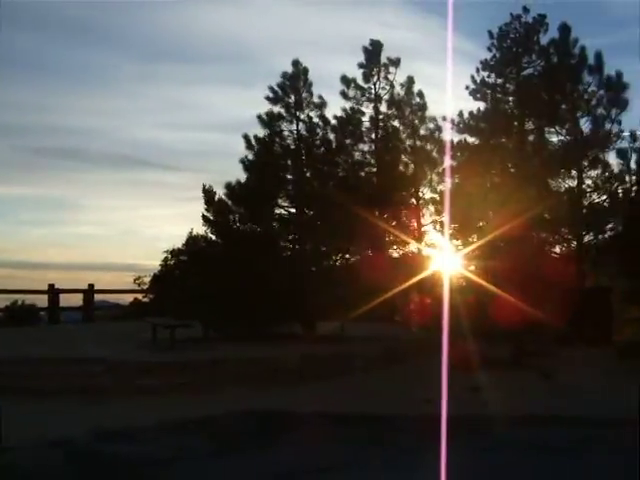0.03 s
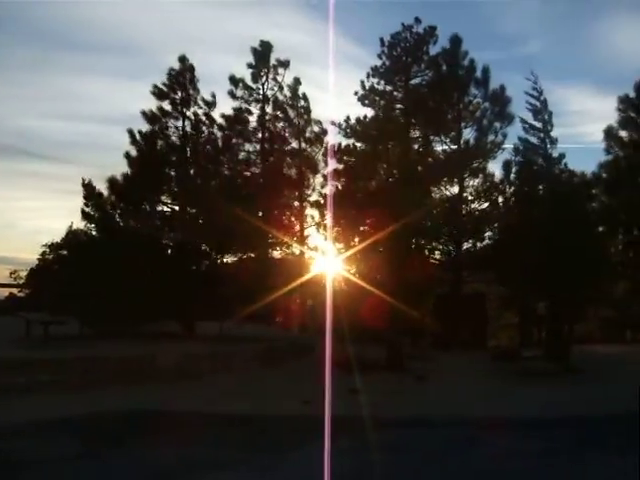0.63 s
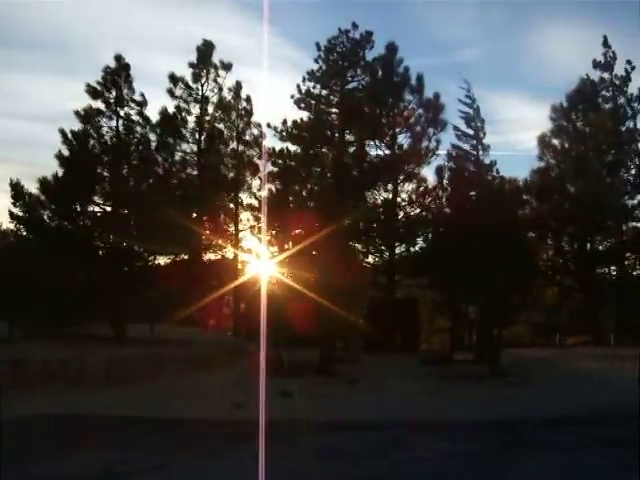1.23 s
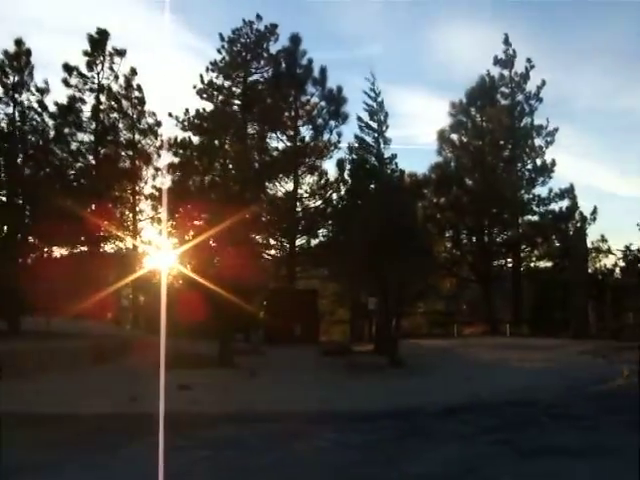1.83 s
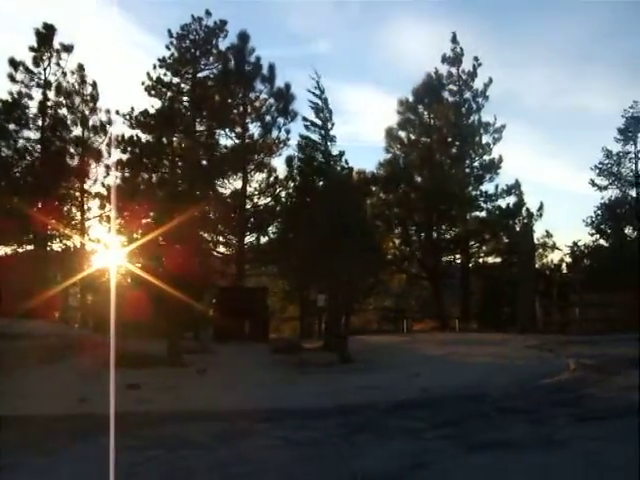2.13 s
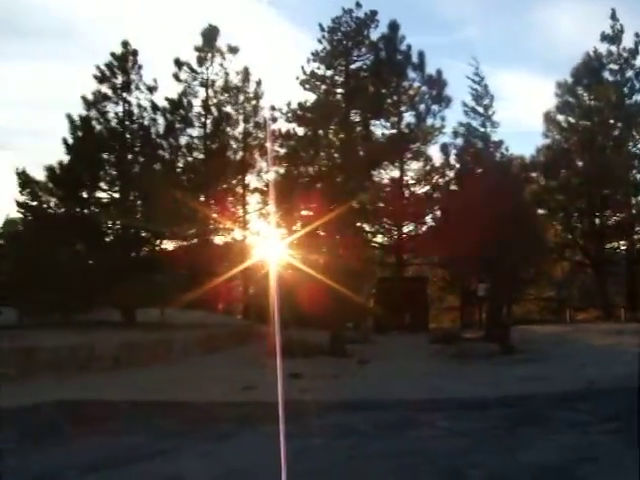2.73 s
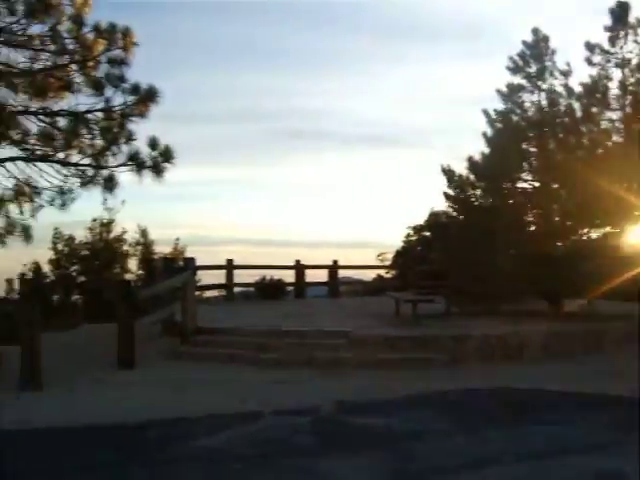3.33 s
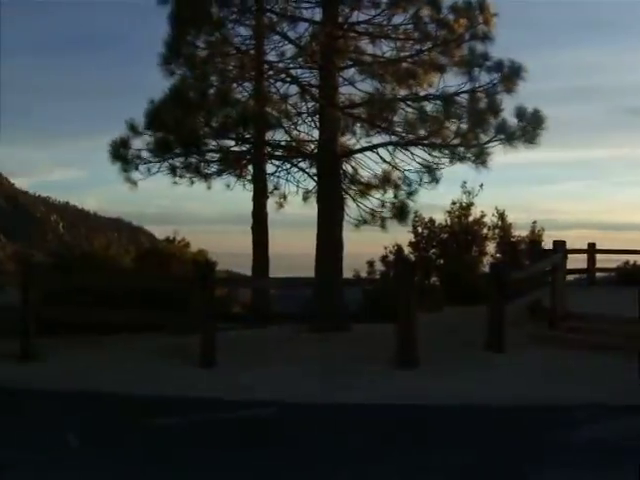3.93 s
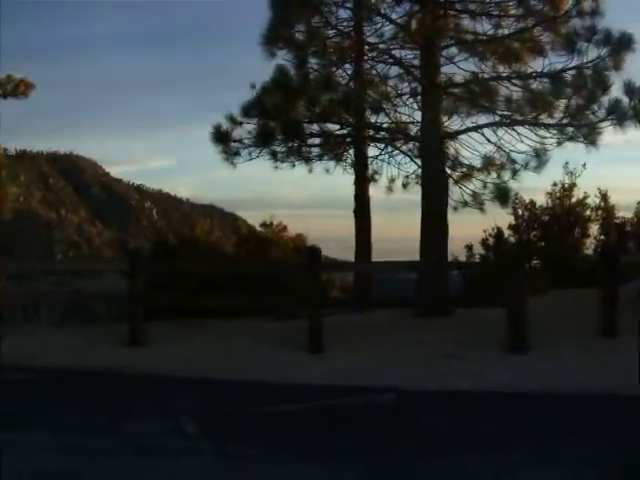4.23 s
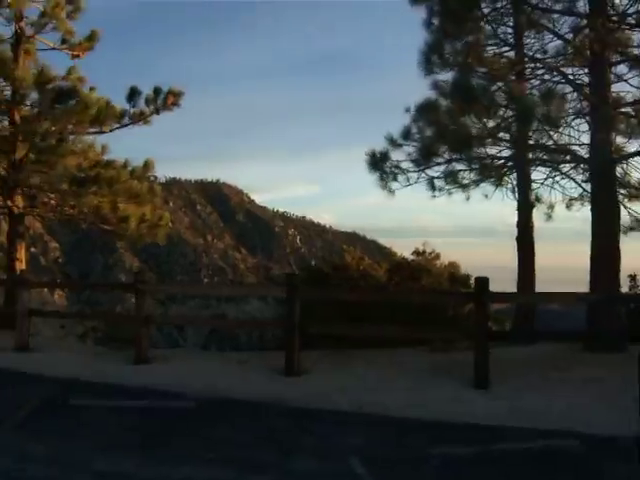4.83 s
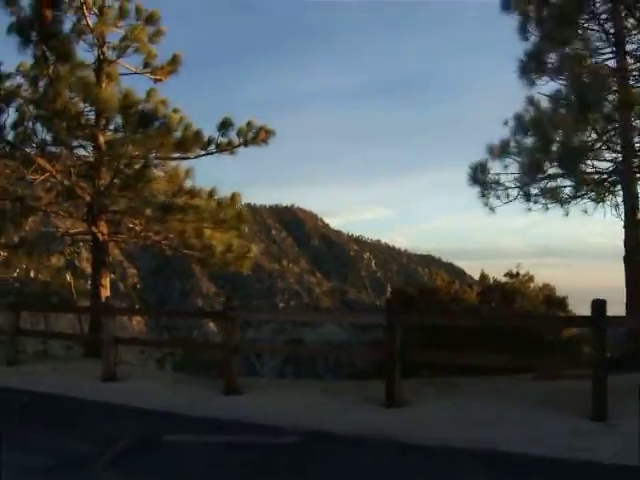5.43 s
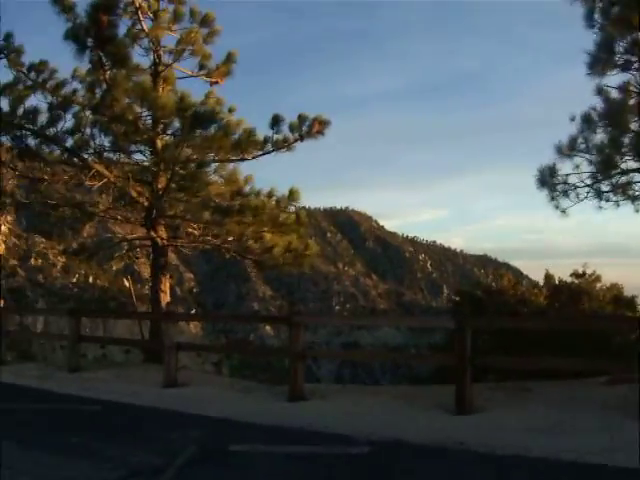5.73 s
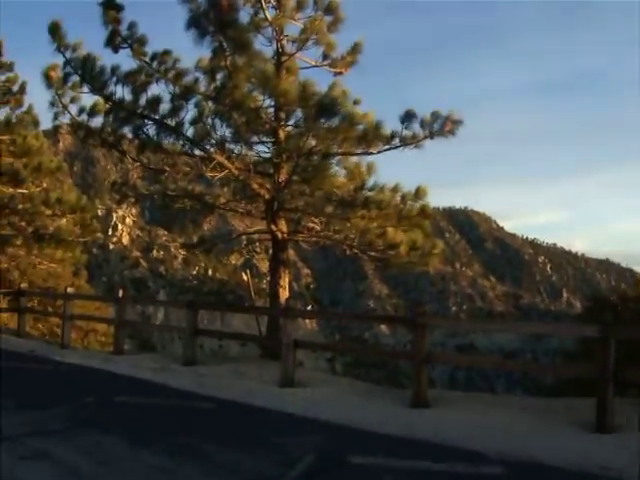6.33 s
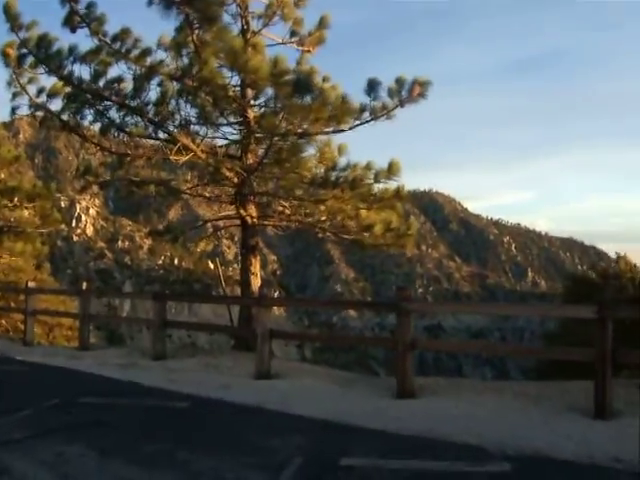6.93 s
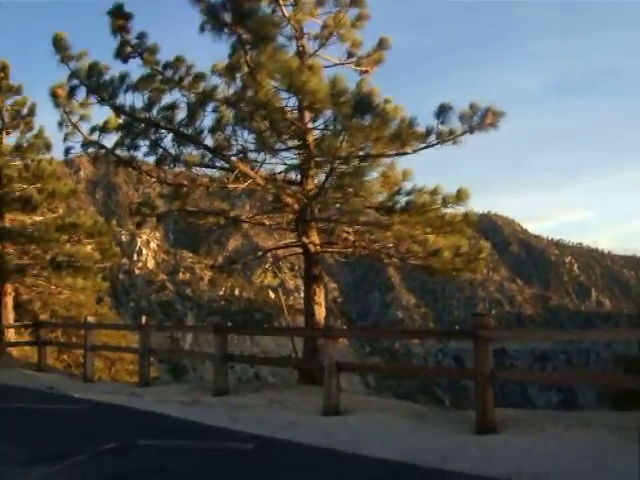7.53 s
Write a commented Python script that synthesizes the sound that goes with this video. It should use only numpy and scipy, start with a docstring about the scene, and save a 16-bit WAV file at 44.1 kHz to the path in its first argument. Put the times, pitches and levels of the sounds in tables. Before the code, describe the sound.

Strong wind roars through pine trees throughout, with a hiss of needles on top, heard from a small handheld camera. A gust thumps the microphone right at the start, then the trees dominate, with a few light bumps. The lens motor whines faintly at about 0.2 and 1.9 seconds, and a very faint, thin electronic whistle runs underneath. From 2 seconds the buffeting builds into heavy rumbling, fluttering and popping, peaking around 2.6 and easing by 3. The trees then rush on with only small puffs against the microphone. At 5 seconds ragged blasts return and continue almost without a break, rumbling and rasping, the loudest briefly ducking the sound of the trees. From about 6.5 seconds a few grains of grit tick on the camera case. The wind swells to a hard, tearing gust around 7.5 seconds.

```python
"""A gust thumps the microphone of a small handheld camera while strong wind roars through pines.
The crowns roar and the needles hiss. Eddies at the microphone port rumble, flutter, rasp and pop,
flow breaks from the case in ragged blasts, and the gain control ducks the trees under the loudest.
The lens motor whines faintly twice over a thin electronic whistle; late on, grit ticks on the case."""
import sys
import numpy as np
from scipy import signal
from scipy.fft import rfft, irfft, next_fast_len
from scipy.io import wavfile
from scipy.ndimage import uniform_filter1d, map_coordinates

SR = 44100
rng = np.random.default_rng(int(sys.argv[2]) if len(sys.argv) > 2 else 0)


def to_wav(s):
    """Save 16-bit WAV."""
    ch = np.atleast_2d(s).T  # columns
    pcm = np.round(np.clip(ch, -1, 1) * 32767)  # PCM
    wavfile.write(sys.argv[1], SR, pcm.astype(np.int16))


N = 339129
TIME = np.arange(N) / SR


def amp(db):
    """Decibels to gain."""
    return 10 ** (np.asarray(db) / 20)


def unit(x):
    """x at rms 1."""
    return x / np.sqrt(np.mean(x ** 2) + 1e-20)


def curves(rows):
    """One value per sample for each column after the time."""
    times_s, *columns = np.transpose(rows)
    return [np.interp(TIME, times_s, column) for column in columns]


def wobble(rate_hz):
    """Smooth random curve, rate_hz knots a second."""
    return map_coordinates(rng.standard_normal(int(N * rate_hz / SR) + 4), [TIME * rate_hz])


def filtered(x, response):
    """x through a frequency response."""
    size = next_fast_len(N + SR // 2)
    return irfft(rfft(x, size) * response(np.fft.rfftfreq(size, 1 / SR)), size)[:N]


def coloured(x, spectrum):
    """x shaped by (frequency [Hz], level [dB]) points, at rms 1."""
    points_hz, db = np.transpose(spectrum)
    return unit(filtered(x, lambda hz: amp(np.interp(np.log(hz + 1), np.log(points_hz), db))))


def swell(start_s, length_s, release_s, attack_s=0.018):
    """Envelope of a push of air: quick rise, hold, exponential release."""
    rise = np.clip((TIME - start_s) / attack_s + 0.5, 0, 1)
    return rise * np.exp(-np.maximum(TIME - start_s - length_s, 0) / release_s)


def ragged(age_s, length_s, attack_s=0.0006):
    """Envelope of a rough burst: sharp start, short hold, quick collapse."""
    rise = 1 - np.exp(-np.maximum(age_s, 0) / attack_s)
    return rise * np.exp(-np.clip(age_s / length_s, 0, 5) ** 3)


# Gusts on the microphone: (start [s], length [s], level [dB], brightness: small eddies over large [dB])
GUSTS = [(-.01, 0.087, -22, 3), (0.065, 0.18, -29, 2), (0.786, 0.055, -35, -4), (1.476, 0.048, -24, -1),
         (1.655, 0.064, -32, -3), (1.98, 0.12, -27, 2.5), (2.144, 0.11, -26.5, 1),
         (2.339, 0.23, -18.5, -0.5), (2.573, .17, -13, -2), (2.78, 0.11, -19.5, -0.5),
         (3.182, .025, -35, 0), (3.536, 0.085, -30, -1.5), (4.118, .14, -35, -5.5),
         (4.595, 0.018, -35, 0.5), (4.832, 0.022, -36, -5), (4.985, 0.12, -28, 9), (5.099, 0.05, -22, 10),
         (5.164, 0.18, -17, -3.5), (5.419, 0.13, -15.5, -2), (5.59, 0.072, -39, -4),
         (5.774, 0.23, -20, 4.5), (6.036, 0.18, -26.5, 3), (6.29, .23, -26, 0.5), (6.602, 0.1, -25.5, 5.5),
         (6.708, 0.13, -18, -1), (6.878, 0.14, -21, 1), (7.075, .24, -19.5, 2.5), (7.32, 0.24, -11, -6.5),
         (7.581, 0.1, -12, 8)]
# Draught between gusts: (time [s], level [dB])
DRAUGHT = [(0, -32), (.7, -35), (1, -48.5), (1.85, -38.5), (2.3, -29.5), (3, -34.5), (3.45, -38),
           (3.9, -47), (4.9, -48.5), (5.2, -23), (6.3, -33), (7.69, -16.5)]

def flow(tilt, release_s, draught_bright_db=-1):
    """Strength of one eddy size: draught and gusts add in power; tilt is dB per dB of brightness."""
    draught_db, = curves(DRAUGHT)
    power = amp(draught_db + tilt * draught_bright_db) ** 2
    for start_s, length_s, db, bright_db in GUSTS:
        power += (amp(db + tilt * bright_db) * swell(start_s, length_s, release_s)) ** 2
    return np.sqrt(power)


def eddies(spectrum, lumps_db):
    """Lumpy turbulence, its strength evened over about a tenth of a second."""
    noise = coloured(rng.standard_normal(N) * amp(lumps_db), spectrum)
    window = np.hanning(SR // 8)
    power = np.abs(signal.fftconvolve(noise ** 2, window / window.sum(), "same"))
    return noise / np.sqrt(power + 1e-6)


# Eddy spectra, largest eddies first: (frequency [Hz], relative level [dB])
HEAVE_SPECTRUM = [(8, -13.5), (22, -3), (50, -0.5), (75, -7), (130, -33), (400, -72)]
RUMBLE_SPECTRUM = [(5, -4), (20, 1), (50, -3), (110, -1.5), (170, -14.5), (300, -36.5), (800, -75)]
FLUTTER_SPECTRUM = [(40, -28.5), (100, -7), (150, 3), (320, -1.5), (450, -10), (700, -31.5), (1500, -47),
                    (4000, -80)]
RASP_SPECTRUM = [(200, -23), (380, 2.5), (500, -0.5), (750, -3), (1000, -9.5), (1400, -22), (2000, -25.5),
                 (3000, -32), (8000, -63)]
TEAR_SPECTRUM = [(400, -9.5), (1200, 9), (1600, 1.5), (2400, 0.5), (3500, -6), (4800, -14.5), (7500, -21.5),
                 (8800, -43)]
# Air tearing across the port's edge: (start [s], length [s], level [dB])
TEARS = [(0.097, 0.022, -33.5), (5.909, 0.054, -31.5), (6.363, 0.34, -38), (6.87, .27, -40),
         (7.163, .15, -32.5), (7.393, 0.11, -29), (7.588, .12, -14.5)]
# Flow stalls at the port: (centre [s], small-eddy dip [dB], half length [s])
STALLS = [(2.727, 7, 0.014), (2.765, 3, 0.0098), (5.088, 1, 0.0037), (5.337, 10, 0.015), (5.775, 15, 0.019),
          (5.852, 18, 0.0095), (6.762, 6, 0.011), (6.863, -1, 0.0083), (7.537, 20, 0.021)]

def buffeting():
    """Large eddies shed small ones in bursts; the small are more fitful and die sooner."""
    bursts = 1.1 * wobble(45) + 1.15 * wobble(220)
    sputter = 0.82 * wobble(60) + 0.65 * wobble(260)
    small_flow = flow(tilt=1, release_s=0.01)
    edge_flow = sum(amp(db) * swell(start_s, length_s, release_s=0.01) for start_s, length_s, db in TEARS)
    rumble = amp(0.5) * flow(tilt=-0.36, release_s=0.04) * eddies(RUMBLE_SPECTRUM, 1.7 * bursts)
    heave = amp(-6.5) * flow(tilt=-1.3, release_s=0.04) * eddies(HEAVE_SPECTRUM, bursts)
    flutter = amp(-1.5) * flow(tilt=0.35, release_s=0.031) * eddies(FLUTTER_SPECTRUM, 3.33 * sputter)
    rasp = amp(-7.5) * small_flow * eddies(RASP_SPECTRUM, 2.2 * sputter + 2.0 * bursts)
    tear = (amp(-30) * small_flow + edge_flow) * eddies(TEAR_SPECTRUM, 3.35 * bursts)
    stall_db = sum(db * np.exp(-((TIME - at_s) / half_s) ** 4) for at_s, db, half_s in STALLS)
    return (heave + rumble) * amp(-0.4 * stall_db) + (flutter + rasp + tear) * amp(-stall_db)


def rush(spectrum, patchy_db):
    """Noise whose bands swell and fade in patches, as single boughs do."""
    bands = signal.stft(rng.standard_normal(N), nperseg=512)[2]
    patches = uniform_filter1d(rng.standard_normal(bands.shape), size=5, axis=0)
    patches = unit(uniform_filter1d(patches, size=18, axis=1))
    noise = signal.istft(bands * amp(patchy_db * patches), nperseg=512)[1][:N]
    return coloured(noise, spectrum)


# Wind in the trees: (time [s], crown roar [dB], needle hiss [dB])
TREE_LEVELS = [(0, -36, -37.5), (.6, -33, -34.5), (1.1, -31, -34), (1.7, -31.5, -35), (2.2, -33.5, -36),
               (2.8, -36.5, -40), (3.3, -35, -37.5), (3.9, -32.5, -36.5), (4.5, -31.5, -35.5),
               (4.9, -30.5, -34.5), (5.6, -36, -40.5), (6.4, -33.5, -38.5), (7.69, -38, -38.5)]
# Roar and hiss spectra: (frequency [Hz], relative level [dB])
CROWN_SPECTRUM = [(20, -8), (170, -4), (300, -9), (440, -9.5), (600, -2), (780, 0), (1020, 0), (1300, -6.5),
                  (1700, -25.5), (3000, -41)]
NEEDLE_SPECTRUM = [(700, -20.5), (1200, -8.5), (1500, -1.5), (1800, 1.5), (2050, -2), (2350, -7),
                   (2800, -9.5), (3600, -10.5), (4400, -15), (5300, -17), (6600, -16.5), (7500, -19.5),
                   (8100, -29), (8800, -40.5)]

def pines():
    """Crowns roar and needles hiss, swaying in the same wind."""
    roar_db, hiss_db = curves(TREE_LEVELS)
    sway = wobble(10)
    roar = amp(roar_db + 0.23 * sway) * rush(CROWN_SPECTRUM, patchy_db=0.54)
    hiss = amp(hiss_db + 0.15 * sway) * rush(NEEDLE_SPECTRUM, patchy_db=0.39)
    return roar + hiss


def tones(lines):
    """Steady sines from (frequency [Hz], rms level [dB]) rows."""
    return sum(np.sqrt(2) * amp(db) * np.sin(2 * np.pi * (hz * TIME + rng.random())) for hz, db in lines)


# Electronic whistle: (frequency [Hz], level [dB])
WHISTLE_TONES = [(7859, -71), (7888, -67.5), (8112, -80), (8141, -72.5)]

def electronics():
    """The camera's circuits whistle faintly throughout."""
    return tones(WHISTLE_TONES)


# Blasts of air: (start [s], level [dB], length [s])
BLASTS = [(0.092, -17.5, 0.048), (2.343, -14, 0.022), (2.424, -19, 0.06), (2.529, -8, 0.016),
          (2.804, -12.5, 0.015), (5.049, -8, 0.011), (5.103, -17, 0.025), (5.215, -18, 0.029),
          (5.436, -10.5, 0.015), (5.603, -19.5, 0.016), (5.786, -11.5, 0.0054), (5.824, -16.5, 0.019),
          (5.892, -16, 0.093), (6.726, -18, 0.012), (6.79, -14.5, 0.031), (6.931, -26, 0.013),
          (7.579, -17, 0.011)]

def blasts():
    """Flow breaks away from the case for a few hundredths of a second."""
    spectrum = [(80, -10), (200, 6), (450, 1.5), (850, -5.5), (1400, -17.5), (3000, -32), (8000, -60.5)]
    envelope = sum(amp(db) * ragged(TIME - start_s, length_s) for start_s, db, length_s in BLASTS)
    return envelope * coloured(rng.standard_normal(N), spectrum)


# Lens motor runs: (start [s], end [s], level [dB])
LENS_RUNS = [(.14, .42, -53), (1.804, 2.08, -48.5)]
# Step rate and overtones: (frequency [Hz], relative level [dB])
LENS_TONES = [(2001, 6), (4002, 0.5), (6003, -7.5)]

def lens_motor(rise_s=0.012, fall_s=0.062):
    """The motor steps unevenly, whining in two short runs."""
    envelope = np.zeros(N)
    for start_s, end_s, db in LENS_RUNS:
        envelope += amp(db) * np.clip(np.minimum((TIME - start_s) / rise_s, (end_s - TIME) / fall_s), 0, 1)
    return envelope * amp(2.2 * wobble(90)) * tones(LENS_TONES)


# Single eddies bursting on the port: (time [s], relative level [dB], width [s])
POPS = [(.156, -7, 0.00045), (.18, -10, 0.00054), (0.261, -9, 0.00086), (1.506, -15, 0.0011),
        (2.063, 3.5, 0.00053), (2.372, 4, 0.00093), (2.397, -3, 0.00035), (2.536, 0, 0.00042),
        (2.618, 11.5, 0.0008), (2.665, 6, 0.0004), (2.741, 2, 0.0005), (2.79, -1.5, 0.00042),
        (3.196, -8.5, 0.0011), (5.076, 1, .0006), (5.228, -4, 0.00033), (5.265, 2, 0.0003),
        (5.304, 2.5, 0.00046), (5.477, 2, 0.000265), (6.206, -7.5, 0.00059), (6.728, -1.5, 0.00073),
        (6.825, -1.5, 0.00075), (6.979, -0.5, 0.00055), (7.136, -13, 0.00097), (7.286, -3, 0.00055),
        (7.526, 1, 0.0004), (7.592, 9, 0.00029)]

def pops(lowpass_hz=2400):
    """A bursting eddy: a rounded pressure cusp inside a slow opposite swing, with a torn edge."""
    spectrum = [(100, -13), (250, 9.5), (600, 5.5), (1100, -6.5),
                (1900, -13.5), (2600, -18.5), (8000, -22.5)]
    cusps, torn = np.zeros(N), np.zeros(N)
    for at_s, db, width_s in POPS:
        distance = np.abs(TIME - at_s) / width_s
        cusps += amp(db + 1) * (np.exp(-distance) - 0.26 * np.exp(-distance / 5))
        smallness = 0.0005 / width_s  # small eddies tear most
        torn += amp(db - 15.5) * smallness * ragged(TIME - at_s + 0.0018, length_s=0.0066)
    edge = torn * coloured(rng.standard_normal(N), spectrum)
    return filtered(cusps + edge, lambda hz: 1 / np.sqrt(1 + (hz / lowpass_hz) ** 5))


# Grains on the case: (time [s], level [dB], pitch [Hz])
GRAINS = [(6.553, -32, 7400), (6.68, -41, 6600), (6.682, -17.5, 2500), (6.725, -36, 7600),
          (7.228, -28, 7940), (7.263, -40, 7400), (7.266, -23, 6900), (7.299, -44, 6000), (7.45, -25, 3600),
          (7.5, -32, 2800)]

def grit(t60_s=0.0094, half_band_hz=1100):
    """Each grain strikes the case with a short, broad tick."""
    ticks = np.zeros(N)
    for at_s, db, pitch_hz in GRAINS:
        age_s = np.maximum(TIME - at_s, 0)
        noise = filtered(rng.standard_normal(N), lambda hz: 1 / np.hypot(1, (hz - pitch_hz) / half_band_hz))
        ticks += amp(db - 60 * age_s / t60_s) * (TIME > at_s) * unit(noise)
    return ticks


def scene():
    """Wind on the microphone, the trees and the camera's own sounds, in mono."""
    return (buffeting() + pines() + electronics() + blasts() + lens_motor() + pops() + grit())[None]


def gain_control(x, threshold_db=-17, max_cut_db=12.5, attack_s=0.013, recovery_db_per_s=48.5, bass_hz=45):
    """Sound over the threshold pulls the gain down, deep bass counting less; the gain climbs back."""
    sensed = filtered(x, lambda hz: 1j * hz / (bass_hz + 1j * hz))
    power = np.abs(uniform_filter1d(sensed ** 2, size=SR // 45))
    over_db = np.clip(10 * np.log10(power + 1e-12) - threshold_db, 0, max_cut_db)
    recovery_db = recovery_db_per_s * TIME
    cut_db = np.maximum.accumulate(over_db + recovery_db) - recovery_db
    pole = np.exp(-1 / (attack_s * SR))
    return x * amp(-signal.lfilter([1 - pole], [1, -pole], cut_db))


def record(dry):
    """The camera rides its gain, rounds the tallest peaks and cuts the high treble."""
    peak_limit, top_hz = 0.8, 8550
    ducked = gain_control(dry[0])
    rounded = ducked / (1 + (ducked / peak_limit) ** 4) ** 0.25
    return filtered(rounded, lambda hz: 1 / np.sqrt(1 + (hz / top_hz) ** 120))[None]


dry = scene()
out = record(dry)
to_wav(out)
```